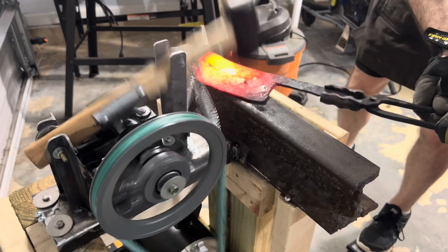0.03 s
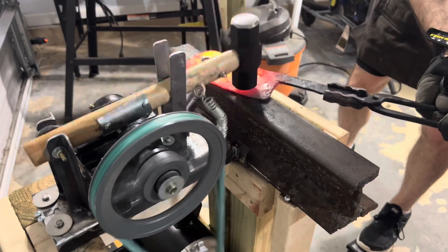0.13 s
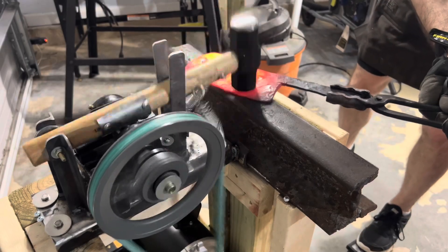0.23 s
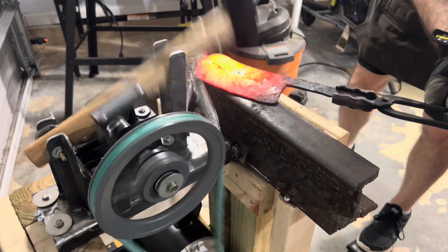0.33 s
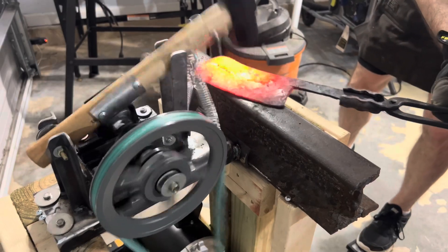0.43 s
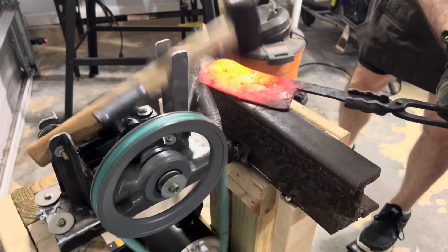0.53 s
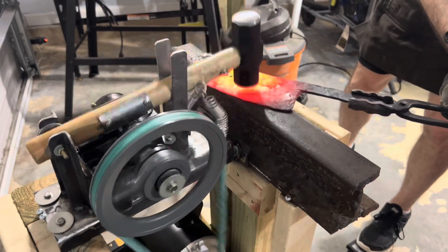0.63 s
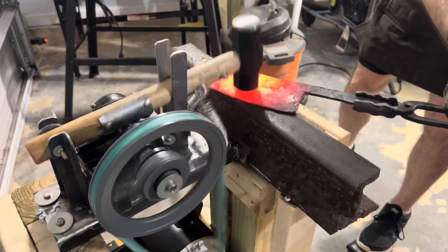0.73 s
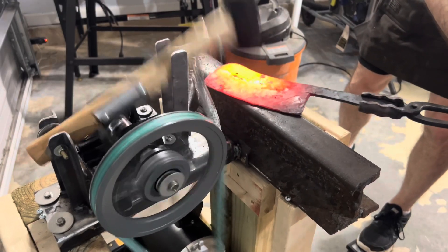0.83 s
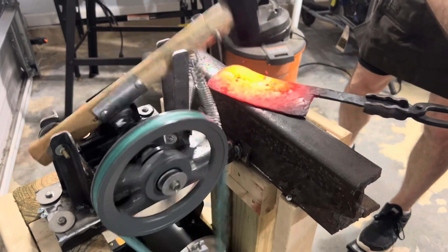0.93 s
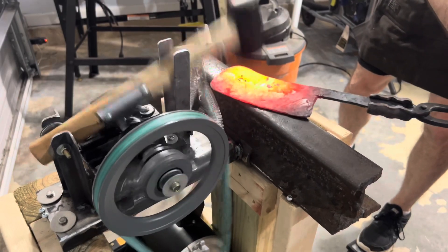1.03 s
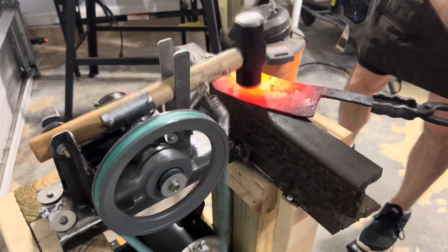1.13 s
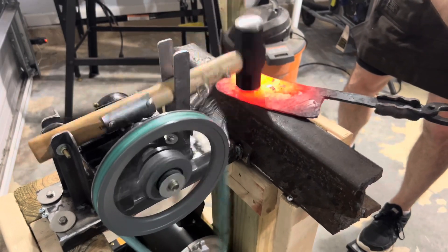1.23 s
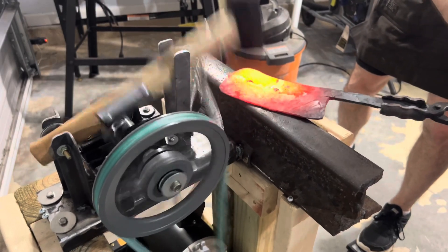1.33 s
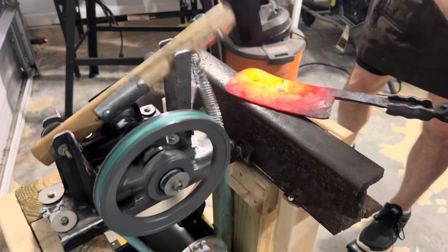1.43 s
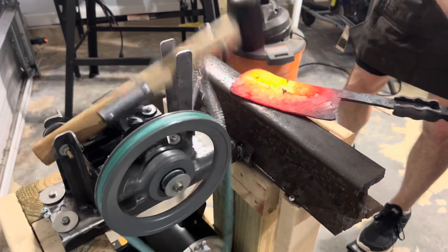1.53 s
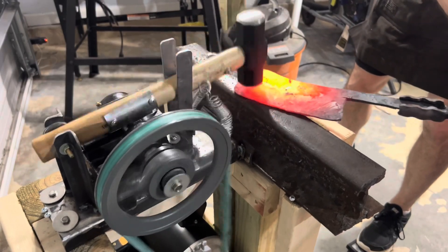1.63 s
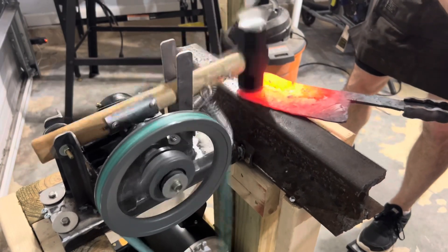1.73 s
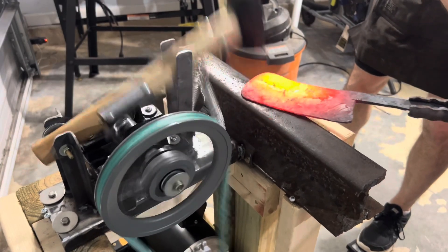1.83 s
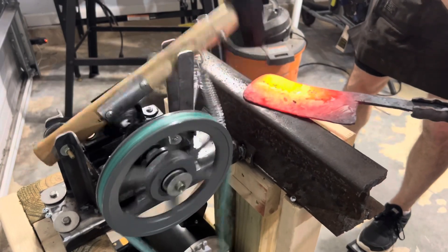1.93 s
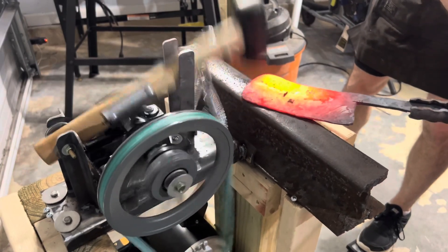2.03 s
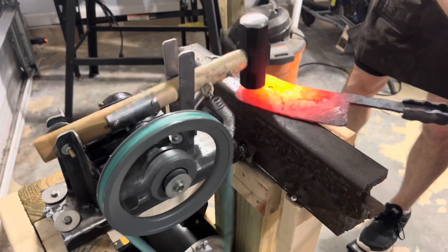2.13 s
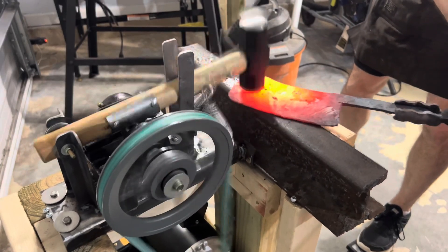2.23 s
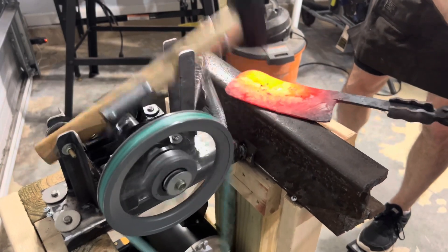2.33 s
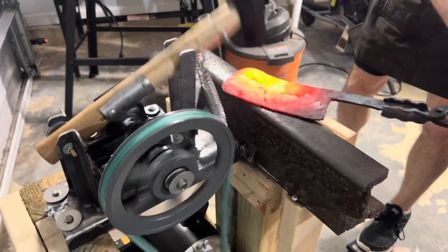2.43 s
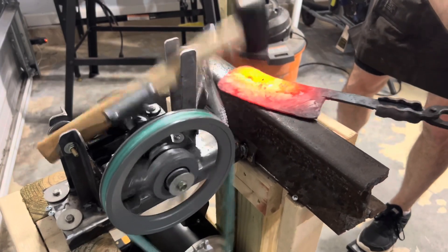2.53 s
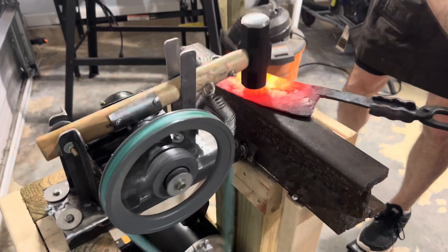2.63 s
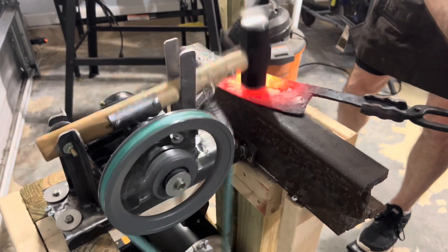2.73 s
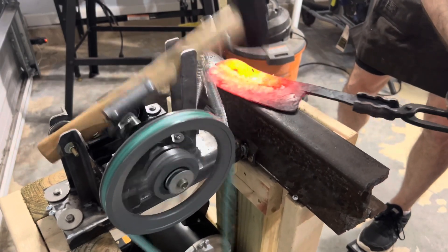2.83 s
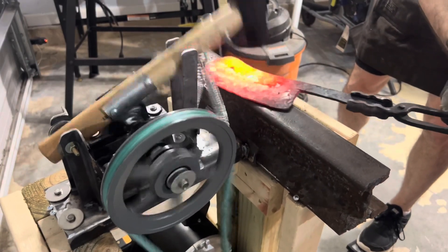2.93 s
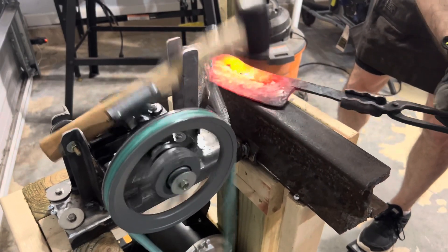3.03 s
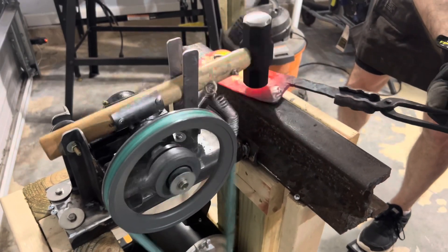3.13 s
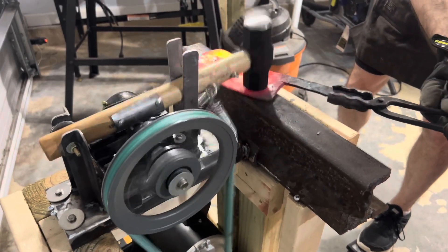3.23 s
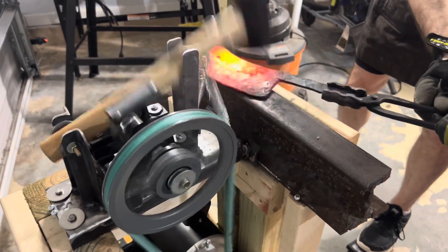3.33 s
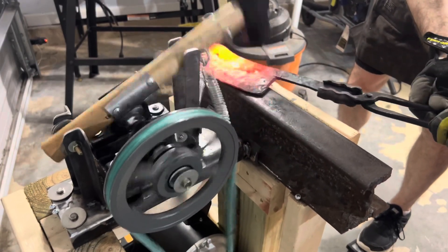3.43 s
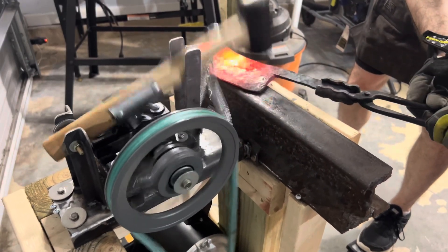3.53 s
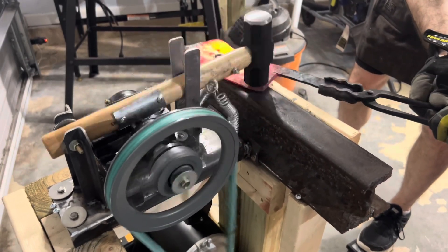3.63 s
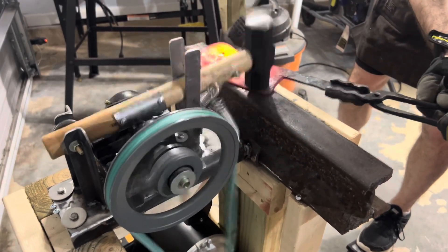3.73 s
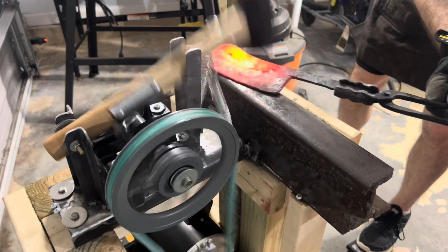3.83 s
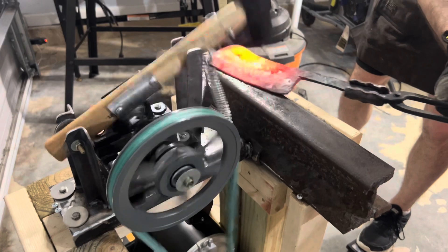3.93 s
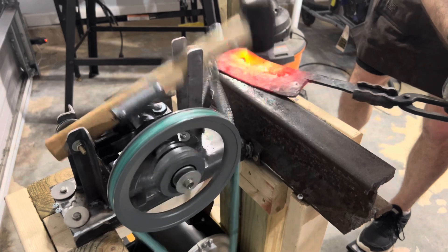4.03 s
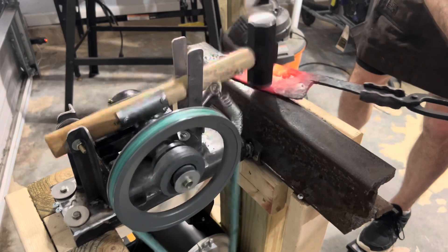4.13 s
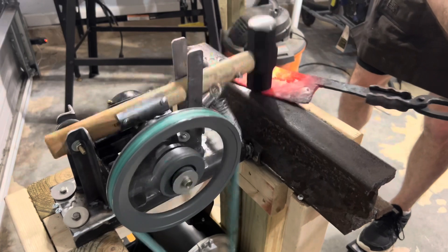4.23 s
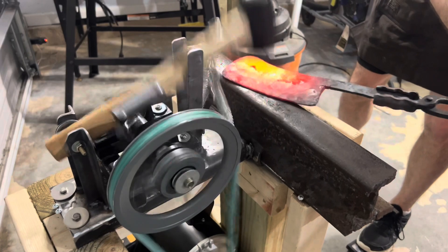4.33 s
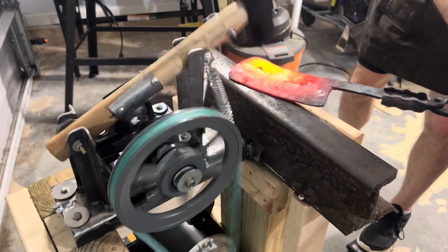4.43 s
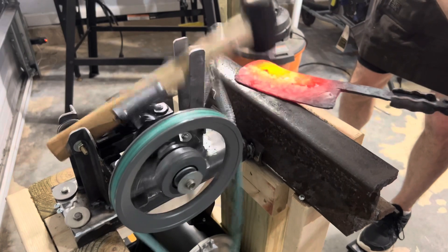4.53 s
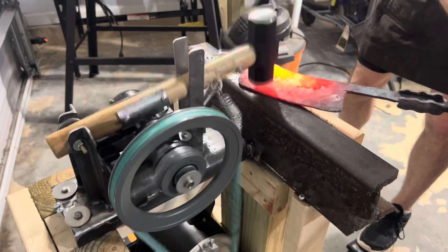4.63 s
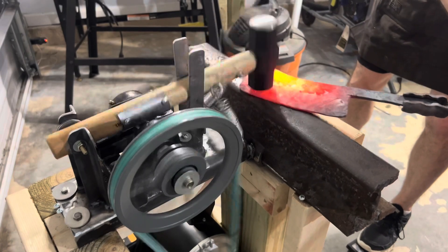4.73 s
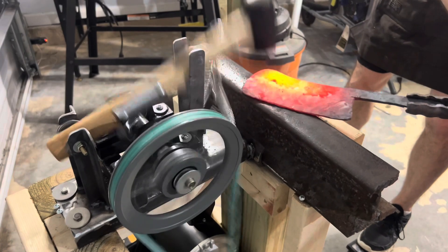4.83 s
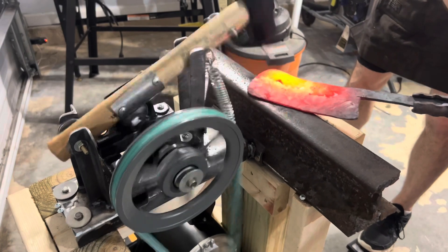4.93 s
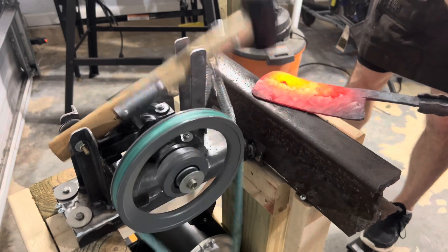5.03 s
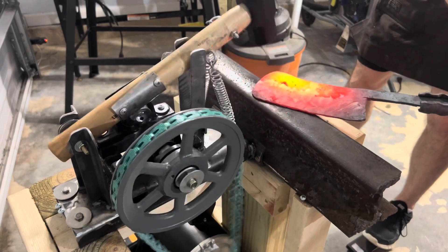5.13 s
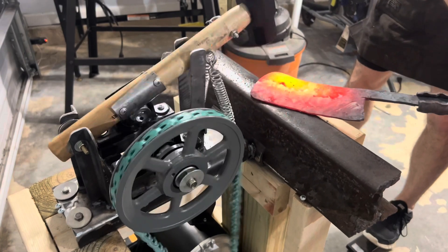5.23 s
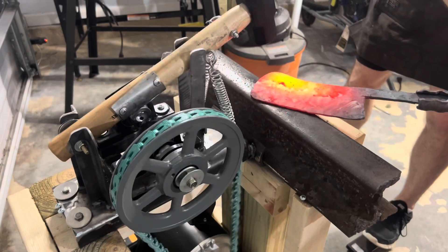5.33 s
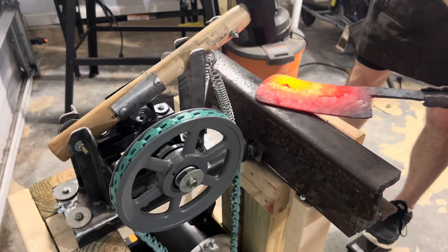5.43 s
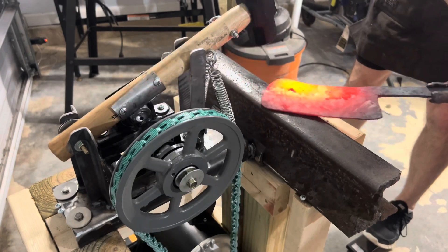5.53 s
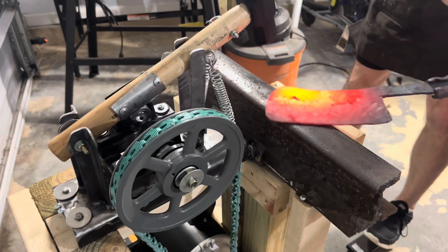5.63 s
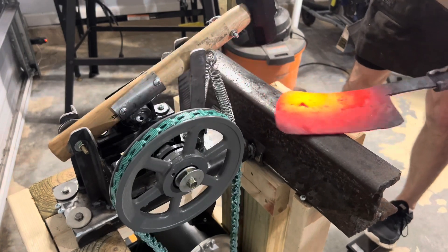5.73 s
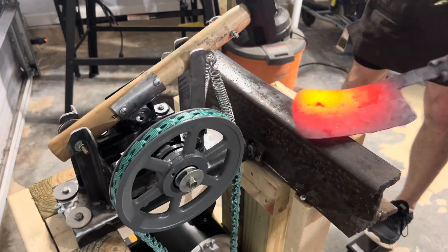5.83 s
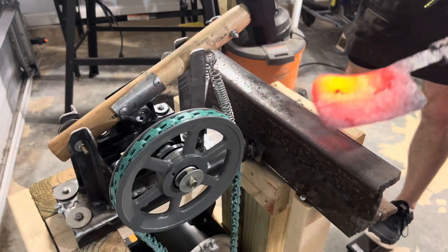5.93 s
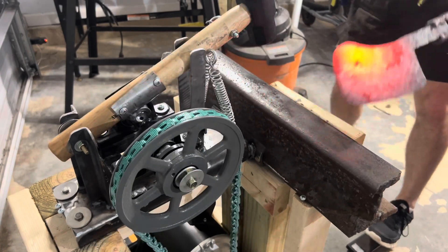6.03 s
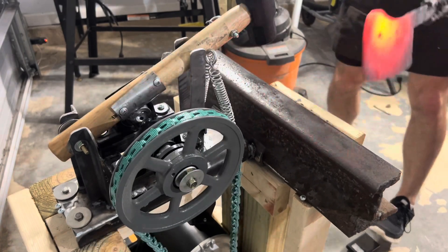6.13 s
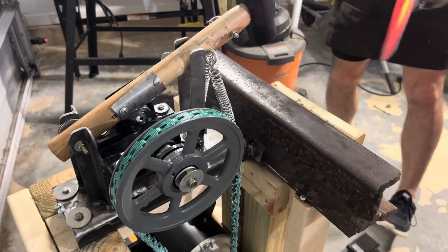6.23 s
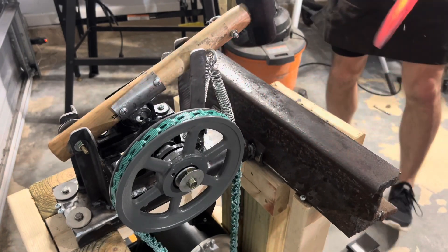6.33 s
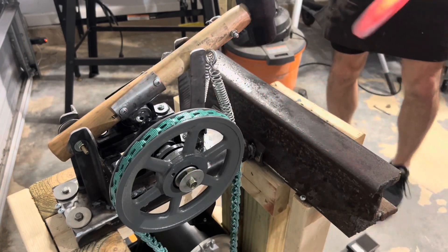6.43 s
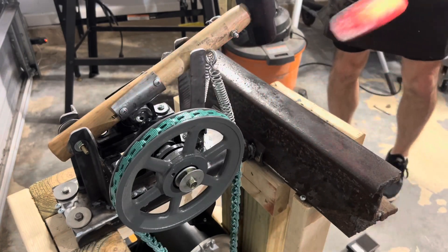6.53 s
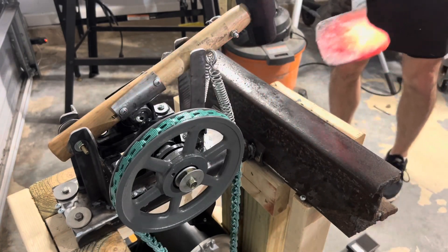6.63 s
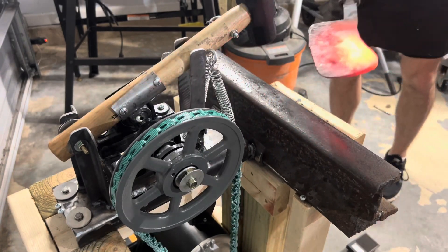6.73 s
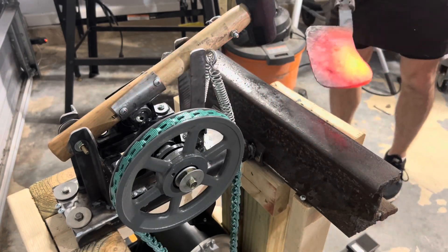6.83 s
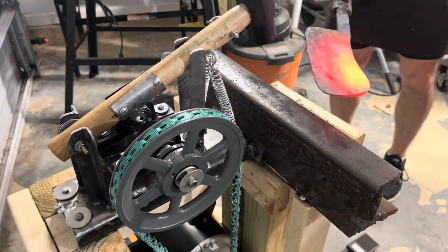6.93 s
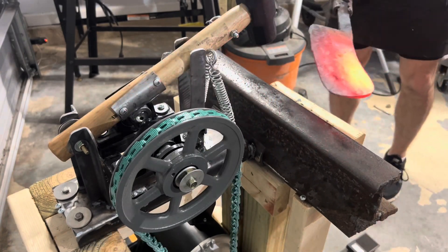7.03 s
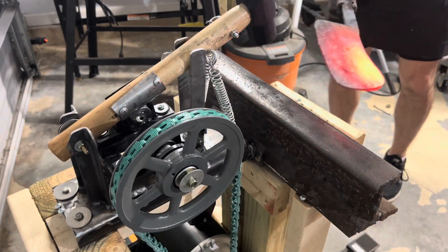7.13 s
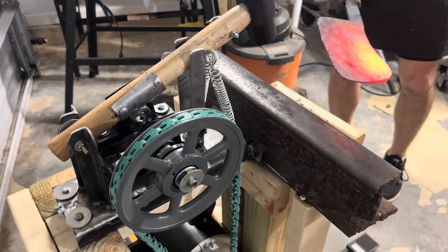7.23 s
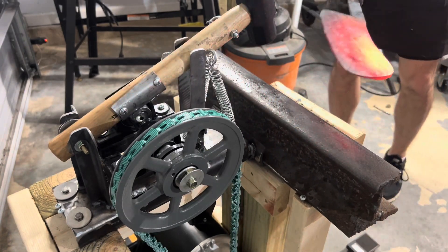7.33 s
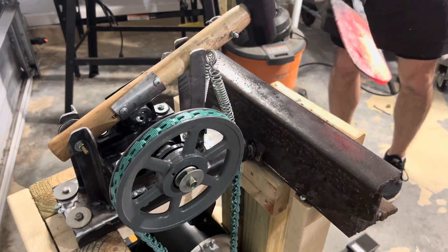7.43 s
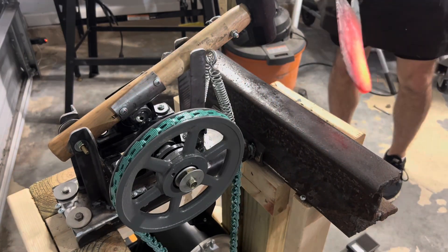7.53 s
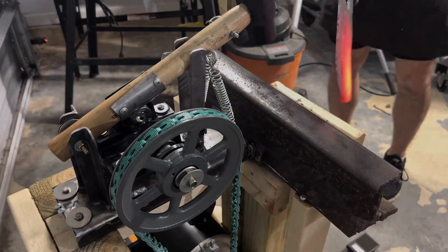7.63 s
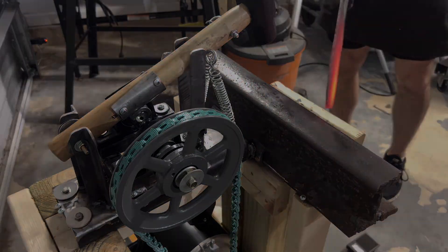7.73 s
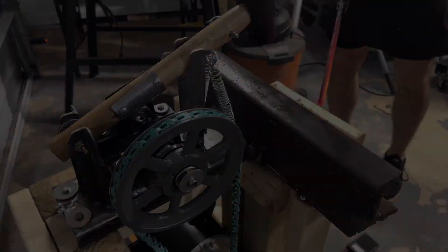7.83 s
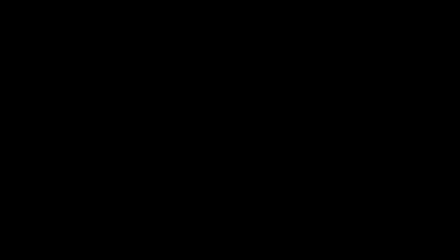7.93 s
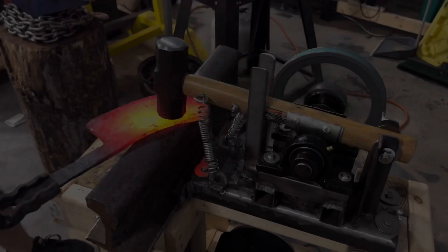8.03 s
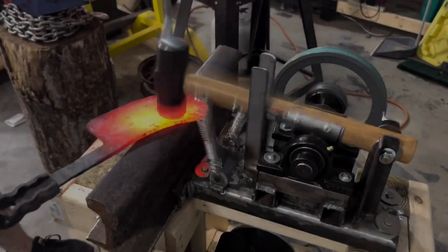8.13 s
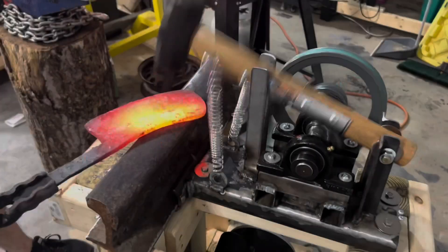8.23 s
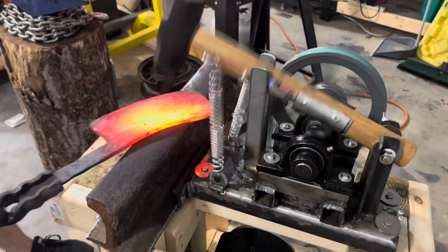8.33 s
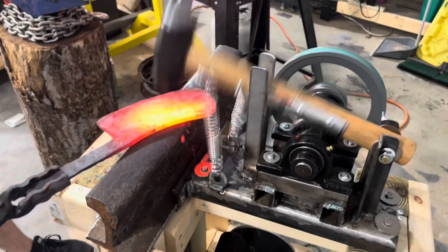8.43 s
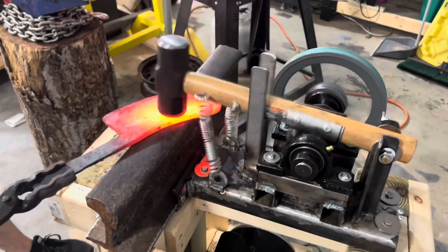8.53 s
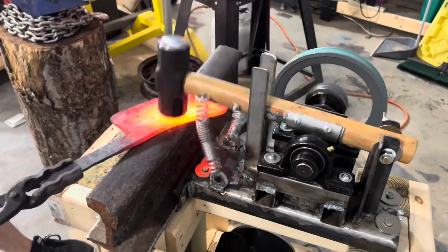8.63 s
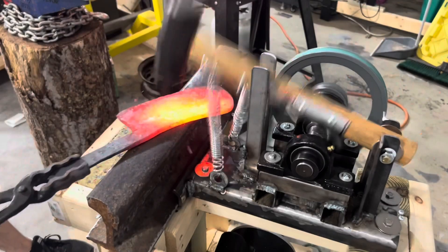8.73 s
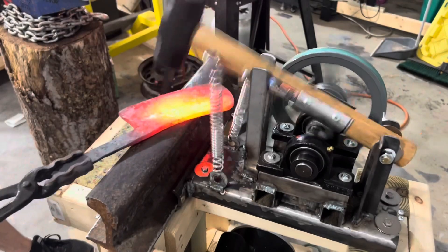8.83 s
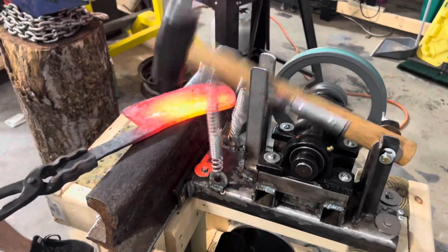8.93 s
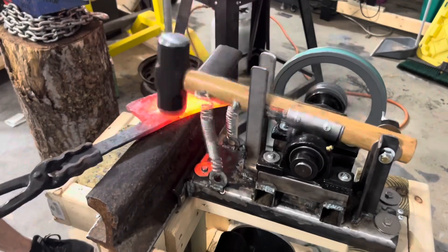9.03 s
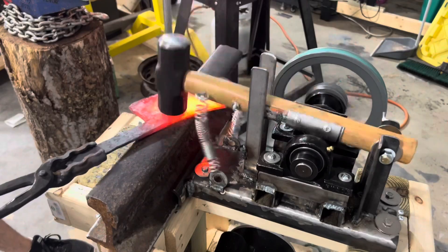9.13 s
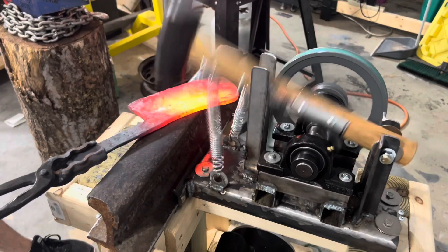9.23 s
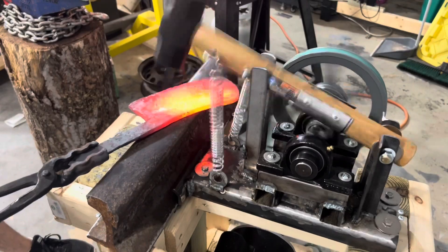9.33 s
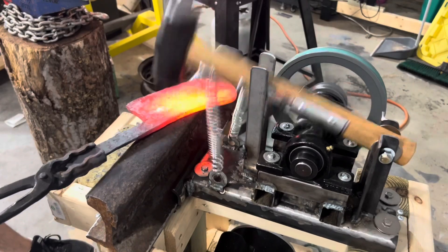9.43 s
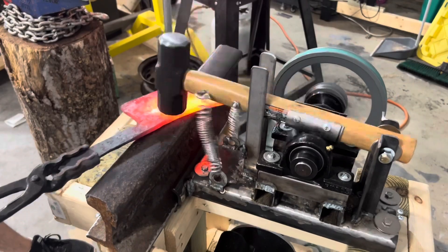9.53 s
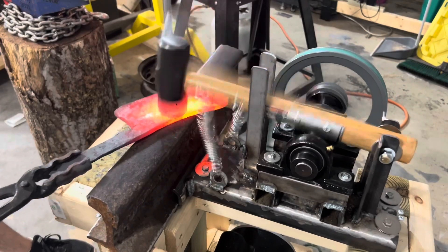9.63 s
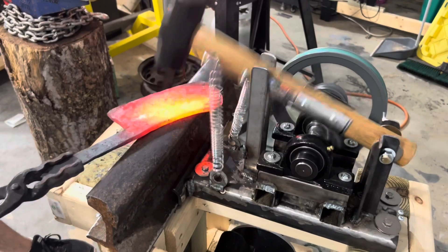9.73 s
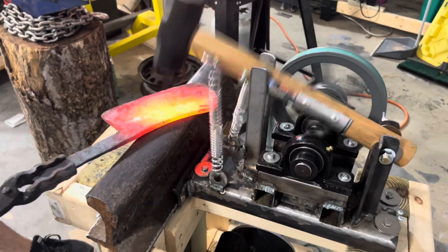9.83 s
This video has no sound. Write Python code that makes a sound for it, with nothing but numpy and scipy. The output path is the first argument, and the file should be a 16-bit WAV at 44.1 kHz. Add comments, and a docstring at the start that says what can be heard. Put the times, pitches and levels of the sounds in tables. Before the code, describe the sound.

A mechanical hammer clangs rapidly on hot steel over a rail, eight even blows a second, pauses over low shop rumble, then starts hammering again.

```python
"""Cam hammer in a workshop

Indoors, one overloading microphone, the same signal on both channels: a cam-driven sledge hammer beats hot
steel on a piece of rail, eight blows a second, pauses over a low shop rumble and starts again. The blows are
noise bands with room tails (the wooden stand booms), ringing rail modes and short rings of blade and tongs.
A noise suppressor turns the din down once it has lasted about a second."""
import sys
import numpy as np
from scipy import signal
from scipy.fft import rfft, irfft
from scipy.io import wavfile
from scipy.ndimage import uniform_filter1d, minimum_filter1d

SR = 44100
rng = np.random.default_rng(int(sys.argv[2]) if len(sys.argv) > 2 else 0)


def int16_out(signal):
    """Quantize to a 16-bit WAV file."""
    q = np.round(np.clip(np.atleast_2d(signal).T, -1, 1) * 32767)
    wavfile.write(sys.argv[1], SR, q.astype(np.int16))


N = 436149


def gain_of(db):
    """Amplitude factor of a level in dB."""
    return 10 ** (np.asarray(db) / 20)


def evened(x):
    """Scales x to an RMS of one."""
    return x / np.sqrt(np.mean(x ** 2) + 1e-20)


def read(points, hz):
    """Reads a table of (f/Hz, value) on a logarithmic frequency scale."""
    f, value = np.transpose(points)
    return np.interp(np.log(hz + 1), np.log(f + 1), value)


def coloured(x, points):
    """Filters x by a spectrum in dB."""
    return irfft(rfft(x) * gain_of(read(points, np.fft.rfftfreq(N, 1 / SR))), N)


def clicks(s, size):
    """Single-sample impulses at the times s (in seconds)."""
    out = np.zeros(N)
    out[np.round(np.asarray(s) * SR).astype(int)] = size
    return out


def fade(x, t60):
    """Each click starts an exponential decay, down to a thousandth after t60 seconds."""
    return signal.lfilter([1], [1, -1000 ** (-1 / (t60 * SR))], x)


def smoothed_twice(x, first, second):
    """Two moving averages in a row, with lengths in samples."""
    return uniform_filter1d(uniform_filter1d(x, first), second)


# low rumble of the quiet shop: [t/s, level/dB]
RUMBLE_LEVEL = [(5.1, -58.5), (5.5, -56), (5.9, -70.5), (6.02, -71.5), (6.08, -56.5), (6.5, -56),
                (7.05, -58), (7.15, -63), (7.25, -52.5), (7.45, -59), (7.6, -56), (7.85, -57.5),
                (7.95, -60), (7.962, -85)]
# its average spectrum: [f/Hz, relative level per Hz/dB]
RUMBLE_SPECTRUM = [(74, -35.5), (125, -9), (155, -3), (184, -12), (221, -7.5), (288, -21.5), (357, 2),
                   (457, -18), (567, -11), (693, -23), (944, -17.5), (1720, -40), (5000, -55),
                   (6500, -81.5), (11000, -120)]
# soft thuds of feet and tongs in the pause: [t/s, level before smoothing/dB, f/Hz, t60/s]
THUDS = [(6.058, -46.5, 164, 0.16), (6.743, -50.5, 428, 0.14), (7.009, -48, 331, 0.16),
         (7.212, -43, 431, 0.17), (7.264, -50, 522, 0.12), (7.299, -45.5, 336, 0.15),
         (7.503, -34, 374, 0.28), (7.551, -38, 369, 0.15), (7.717, -47, 210, 0.18)]
# noisy part of a thud: [f/Hz, relative level per Hz/dB]
SCUFF_SPECTRUM = [(68, -56), (115, -46), (382, 10), (625, -30), (809, -8), (867, -17), (1020, -10),
                  (3000, -59), (3900, -89), (6600, -120)]


def shop():
    """Patchy rumble, noise shaped in time and frequency, with thuds of decaying sine and scuffing noise."""
    z = rng.standard_normal((N // 256 + 5, 513, 3)).T
    patches = evened(uniform_filter1d(uniform_filter1d(z[2], 3, 0), 9, 1))
    hz = np.fft.rfftfreq(1024, 1 / SR)[:, None]
    shape = gain_of(read(RUMBLE_SPECTRUM, hz) + 3.6 * patches)
    rumble = signal.istft((z[0] + 1j * z[1]) * shape, nperseg=1024, noverlap=768)[1][:N]
    # the microphone drops deep bass
    rumble = signal.sosfilt(signal.butter(4, 120, "high", fs=SR, output="sos"), rumble)
    t = np.arange(N) / SR
    out = evened(rumble) * gain_of(np.interp(t, *np.transpose(RUMBLE_LEVEL)))
    scuff = evened(coloured(rng.standard_normal(N), SCUFF_SPECTRUM))
    for s, db, thud_hz, t60 in THUDS:
        decay = fade(clicks([s + 0.0019], gain_of(db)), t60)
        swell = smoothed_twice(decay, 500, 300)  # softens the attack
        out += swell * (0.67 * np.sin(2 * np.pi * thud_hz * t) + 0.43 * scuff)
    return out


# dull knocks: one ringing at the opening, the others just before the second run of blows:
# [t/s, level/dB, t60/s]
KNOCKS = [(0.0, -15, 0.51), (7.973, -44, 3.0), (7.989, -43, 2.6), (8.005, -25.5, 0.31), (8.137, -9.5, 0.52)]
# colour of a knock: [f/Hz, relative level per Hz/dB]
KNOCK_SPECTRUM = [(88, -76), (150, -30.5), (695, -1), (877, 5.5), (1340, -2.5), (4560, -16.5),
                  (6470, -14.5), (14300, -26.5), (15500, -28.5)]


def knocks():
    """Dull knocks of steel on wood: decaying coloured noise, each knock cut off after 0.6 s."""
    level = np.zeros(N)
    for s, db, t60 in KNOCKS:
        before_end = np.arange(N) < (s + .6) * SR
        level += fade(clicks([s], gain_of(db)), t60) * before_end
    return level * evened(coloured(rng.standard_normal(N), KNOCK_SPECTRUM))


BLADE_DB, BLADE_T60 = -7.5, .22  # level in dB, t60 in s


def blade(s, db, count=44):
    """Short sine rings of blade and tongs, at pitches drawn at random for each blow."""
    place, size, turn = rng.random((len(s), count, 3)).T
    hz = 700 * 21 ** (place ** .6)  # 700 to 14700 Hz
    t = np.arange(7000) / SR
    gain = gain_of(db + BLADE_DB + read(CRASH_SPECTRUM, hz) + 9.9 * size)
    shape = gain_of(-60 * t / BLADE_T60) * (1 - np.exp(-t / 0.038))
    out = np.zeros(N + len(t))
    for k, start in enumerate(np.round(s * SR).astype(int)):
        rings = np.sin(2 * np.pi * (hz[:, k, None] * t + turn[:, k, None]))
        out[start:start + len(t)] += shape * (gain[:, k] @ rings)
    return out[:N]


# clatter of a blow: [f/Hz, relative level per Hz/dB]
CRASH_SPECTRUM = [(88, -64.5), (150, -28.5), (209, -24.5), (509, -4.5), (708, 2), (1830, -9.5),
                  (2140, -8.5), (3100, -15), (4060, -7), (4930, -15), (6860, -13), (14100, -20.5),
                  (15500, -17)]
# how long the room holds each pitch: [f/Hz, t60/s]
ROOM_T60 = [(250, 0.53), (700, 0.65), (1700, 0.88), (4600, 0.5), (12000, 0.42)]
CRASH_DB, COLOUR_DB = -2, 1.73  # level of the clatter; chance spread of its bands (both dB)


def crash(s, db):
    """Dense clatter and its room tail: half-octave noise bands, each dying at its own speed, powers adding."""
    noise = rfft(evened(coloured(rng.standard_normal(N), CRASH_SPECTRUM)))
    half_octave = 2 * np.log2(np.fft.rfftfreq(N, 1 / SR) + 1)
    colour_db = COLOUR_DB * rng.standard_normal((len(s), 30))  # no two blows sound alike
    out = np.zeros(N)
    for k in range(13, 29):
        hz = 2 ** (k / 2)
        band = irfft(noise * np.clip(1 - abs(half_octave - k), 0, 1), N)
        blow_power = gain_of(2 * (db + colour_db[:, k]))
        power = fade(clicks(s, blow_power), read(ROOM_T60, hz) / 2)  # half the t60, as power is squared level
        rise = round(np.clip(14.0 * SR / hz, 60, 2000))  # samples; bass swells more slowly than treble
        power = uniform_filter1d(power, rise, origin=(rise - 1) // 2)
        out += band * np.sqrt(abs(power))
    return gain_of(CRASH_DB) * out


# spells of blows in which a rail mode rings out strongly:
# [first blow t/s, last blow t/s, mode f/Hz, lift over its muted level/dB]
SINGS = [(0.18, 1.68, 2103, 3), (0.18, 1.43, 3402, 3), (0.43, 1.18, 4012, 9), (0.43, 1.68, 11610, 8),
         (0.55, 1.81, 4518, 13), (0.68, 1.81, 10175, 8), (0.93, 1.55, 1203, 5), (1.43, 1.43, 7010, 19),
         (1.43, 1.68, 4012, 14), (1.68, 2.18, 1203, 9), (1.93, 2.69, 5430, 11), (2.05, 2.31, 10175, 13),
         (2.43, 3.31, 10175, 18), (2.18, 2.93, 4012, 10), (2.43, 2.43, 1203, 12), (2.68, 2.81, 1203, 15),
         (2.68, 3.31, 4518, 13), (3.18, 3.31, 5430, 16), (3.3, 3.43, 2840, 13), (3.68, 5.06, 2103, 5),
         (3.8, 3.93, 10175, 19), (3.8, 3.93, 2840, 14), (3.8, 3.93, 5430, 15), (3.93, 4.05, 3402, 15),
         (4.18, 4.43, 7010, 21), (4.43, 4.43, 4518, 17), (4.43, 5.06, 4012, 20), (4.43, 4.68, 5853, 15),
         (4.56, 4.68, 5430, 16), (4.56, 4.8, 3402, 16), (4.56, 5.06, 11610, 15), (4.56, 4.8, 1203, 10),
         (4.93, 4.93, 7010, 23), (4.93, 5.06, 5853, 17), (8.22, 8.22, 1203, 13), (8.35, 8.47, 2840, 13),
         (8.35, 8.6, 2103, 6), (8.84, 9.72, 1203, 7), (8.96, 9.22, 4012, 11), (9.34, 9.6, 4012, 15),
         (9.72, 9.85, 4012, 9), (9.09, 9.85, 2103, 8), (9.47, 9.85, 2840, 16)]
SPREAD_DB = 4  # chance spread of the modes
MUTED_DB, SING_SPREAD = -5, .45  # modes that can sing, when they do not; share of spread left while singing


def singing(s, chance):
    """Size in dB of each blow's kick to each mode: chance, and a lift while the mode sings out."""
    kick_db = SPREAD_DB * chance
    modes = [np.argmin(abs(np.array(RAIL_HZ) - hz)) for _, _, hz, _ in SINGS]
    kick_db[:, modes] += MUTED_DB
    for (first, last, _, lift_db), k in zip(SINGS, modes):
        on = (s > first - .05) & (s < last + .05)
        kick_db[on, k] = MUTED_DB + lift_db + SING_SPREAD * SPREAD_DB * chance[on, k]
    return kick_db


# pitches of the rail's modes: [f/Hz]
RAIL_HZ = [1203, 2103, 2840, 4012, 4518, 5430, 7010, 10175, 328, 700, 727, 985, 3402, 5586, 5715, 5853,
           6355, 6640, 8095, 9985, 11610, 13600]
# the same modes in the same order: [relative level/dB, t60/s]
RAIL_MODES = [(1.5, 0.3), (-4, 0.62), (-11, 0.41), (-8, 0.36), (-12, .35), (-10, 0.3), (-16, .25),
              (-12, 0.18), (-17, 0.59), (-10, 0.75), (-1, 0.051), (-4, .3), (-6, 0.26), (-19, 0.42),
              (-20, .2), (-12, 0.39), (-20.5, 0.71), (-22, 0.23), (-17.5, 0.37), (-18, .3), (-18.5, .4),
              (-24, 0.24)]
RAIL_DB = -6
BUILD = 0.0014  # share per sample by which a ring builds up


def rail(s, db):
    """Every blow kicks every mode with its own size and sets its phase anew; reflections make the ring waver."""
    chance = rng.standard_normal((len(s), len(RAIL_MODES)))
    turn = rng.random((len(s), len(RAIL_MODES)))
    kick_db = singing(s, chance)
    t = np.arange(N) / SR
    latest = np.searchsorted(s, t) - 1  # the last blow before each moment
    a, b = (evened(smoothed_twice(v, 450, 450)) for v in rng.standard_normal((2, N)))
    c, d = (evened(smoothed_twice(v, 70, 70)) for v in rng.standard_normal((2, N)))
    # the quick part: a rough, noisy skirt around each mode
    waver = 1 + 0.55 * (a + 1j * b) + 0.4 * (c + 1j * d)
    out = np.zeros(N)
    for k, (hz, (mode_db, t60)) in enumerate(zip(RAIL_HZ, RAIL_MODES)):
        size = gain_of(db + mode_db + kick_db[:, k])
        level = np.sqrt(fade(clicks(s, size ** 2), t60 / 2))
        ring = level * np.exp(2j * np.pi * turn[latest, k])
        ring = signal.lfilter([BUILD], [1, BUILD - 1], ring)  # the room fills with the tone gradually
        mode_waver = np.roll(waver, k * N // len(RAIL_MODES))
        out += (ring * np.exp(2j * np.pi * hz * t) * mode_waver).real
    return gain_of(RAIL_DB) * out


# blows of the hammer: [t/s, strength/dB]
BLOWS = [(0.056, -0.7), (0.178, 1.2), (0.3028, 3.2), (0.4307, 1), (0.5531, 1.3), (0.6783, 2.3), (0.8034, 2),
         (0.93, 1.5), (1.0543, 2), (1.1786, 4.5), (1.3033, 3), (1.4295, 1.5), (1.5543, 1.8), (1.6785, 1),
         (1.8063, 2.5), (1.9322, 6.4), (2.0554, 6), (2.1842, 5), (2.3057, 8.2), (2.431, 11), (2.558, 24.5),
         (2.6844, 10), (2.8068, 17.5), (2.9336, 5), (3.0595, 8), (3.1813, 8), (3.304, 12), (3.4318, 1.5),
         (3.5546, 4.5), (3.6803, 6.5), (3.8083, 11.0), (3.931, 11), (4.0542, 2), (4.1776, 4.5), (4.3053, 4),
         (4.43, 12.0), (4.556, 11.0), (4.6778, 11), (4.803, 11), (4.928, 6), (5.0562, 5), (8.223, -1.6),
         (8.3456, 1.5), (8.47, -0.8), (8.5936, 0.5), (8.715, -0.7), (8.8426, 0.7), (8.965, 1.9),
         (9.0918, 0), (9.213, 2), (9.3395, 1.6), (9.4679, 7), (9.6005, 8.5), (9.7247, 7), (9.849, 20.5)]


def scene():
    """Hammer and shop added up, the same on both channels."""
    s, db = np.transpose(BLOWS)
    hammer = crash(s, db) + rail(s, db) + blade(s, db) + knocks()
    return np.array([hammer, hammer]) + shop()


# suppressor at full depth: [f/Hz, level removed/dB]
CUT = [(60, 12), (300, 17.5), (800, 32), (2000, 23), (5000, 18.5), (12000, 14.5)]
# din before the cut begins: [f/Hz, t/s]
CUT_DELAY = [(100, 0.72), (400, 0.85), (1000, 1.103), (4000, 1.36), (12000, 1.41)]
# ducking after each jump in treble: [t since the jump/s, extra level removed/dB, before the share below]
DUCK = [(0.0, 10), (.02, 5.5), (.05, 2.5), (.07, 4), (.1, 8.5), (.125, 9), (.2, 15)]
# how much of that ducking each pitch gets: [f/Hz, share]
DUCK_SHARE = [(300, 1.1), (800, 0.0788), (2000, 0.74), (5000, 1.03), (12000, 1.69)]


def suppress(x, dry):
    """Lowers a lasting din by band; also shuts at each attack, opens, and shuts again on the tail."""
    hz, t, z = signal.stft(x, SR, nperseg=256, noverlap=192)
    power = abs(signal.stft(dry, SR, nperseg=256, noverlap=192)[2]) ** 2
    # the loudest frame of the last 0.7 s decides whether the din goes on
    loudest_db = -minimum_filter1d(-10 * np.log10(power.sum(0) + 1e-12), 501, origin=250)
    busy_s = t - np.maximum.accumulate(np.where(loudest_db > -20, -.05, t))  # how long the din has lasted
    depth = np.clip((busy_s - read(CUT_DELAY, hz)[:, None]) / 1.067, 0, 1) ** 1.187
    treble_db = uniform_filter1d(10 * np.log10(power[40:85] + 1e-12).mean(0), size=5)
    jump = np.roll(treble_db, -3) - np.roll(treble_db, 3) > 3
    since_jump = t - np.maximum.accumulate(np.where(jump, t, 0))
    duck_db = np.interp(since_jump, *np.transpose(DUCK))
    bin_db = 10 * np.log10(uniform_filter1d(abs(z) ** 2, 25, 1) + 1e-14)
    near_db = uniform_filter1d(-minimum_filter1d(-bin_db, size=4, axis=0), size=2, axis=0)
    # a strong tone opens its whole band
    spared_db = 0.73 * np.clip(near_db - uniform_filter1d(near_db, size=15, axis=0), -8, 12)
    alert = np.clip((busy_s - 1.15) / 0.89, 0, 1)  # share of the ducking in force
    pump_db = alert * (read(DUCK_SHARE, hz)[:, None] * duck_db - spared_db)
    cut_db = depth * read(CUT, hz)[:, None] + pump_db
    # the quiet rumble is left alone
    over_rumble_db = bin_db + 57.5 - read(RUMBLE_SPECTRUM, hz)[:, None]
    cut_db = np.minimum(cut_db, np.maximum(over_rumble_db, 0))
    return signal.istft(z * gain_of(-cut_db), SR, nperseg=256, noverlap=192)[1][:N]


KNEE, CEILING = 6, .95  # sharpness and height of the overload
HISS_DB, EDGE_HZ = -90, 15680  # hiss before the band limit; upper edge of that band


def record(dry):
    """One microphone overloads, the suppressor follows; a trace of hiss; then the band limit."""
    mid = dry.mean(0)
    overloaded = mid / (1 + abs(mid / CEILING) ** KNEE) ** (1 / KNEE)
    mid = suppress(overloaded, mid)
    mid = np.clip(mid, -CEILING, CEILING) + gain_of(HISS_DB) * rng.standard_normal(N)
    mid = signal.oaconvolve(mid, signal.firwin(511, EDGE_HZ, window=("kaiser", 9), fs=SR), "same")
    return np.array([mid, mid])


dry = scene()
out = record(dry)
int16_out(out)
```